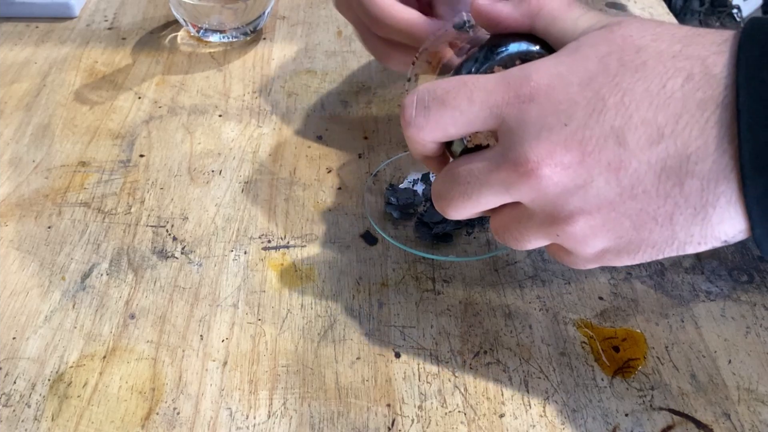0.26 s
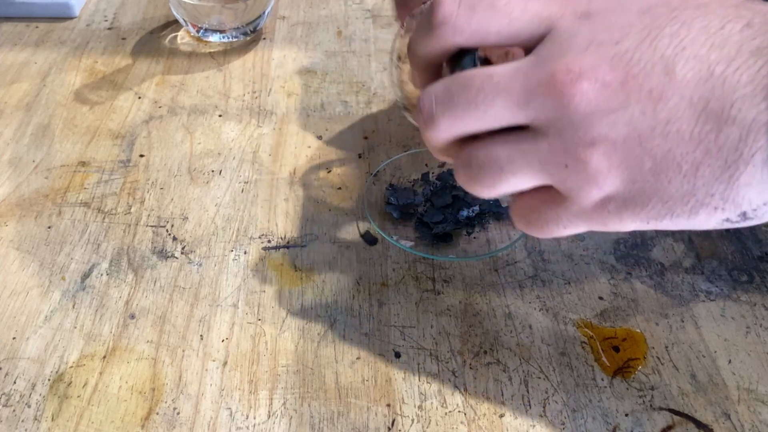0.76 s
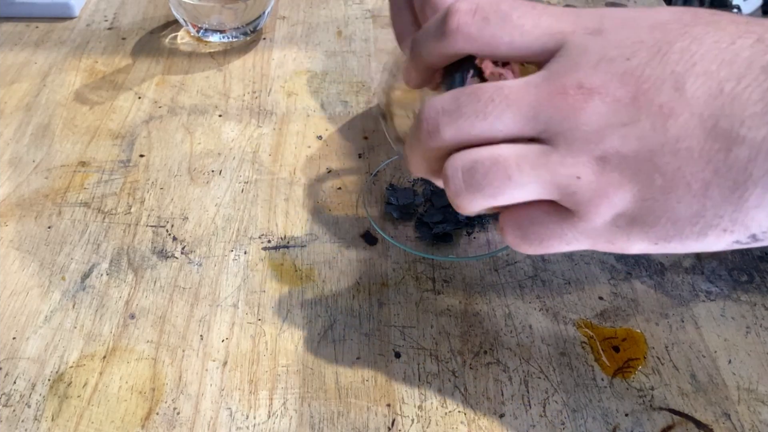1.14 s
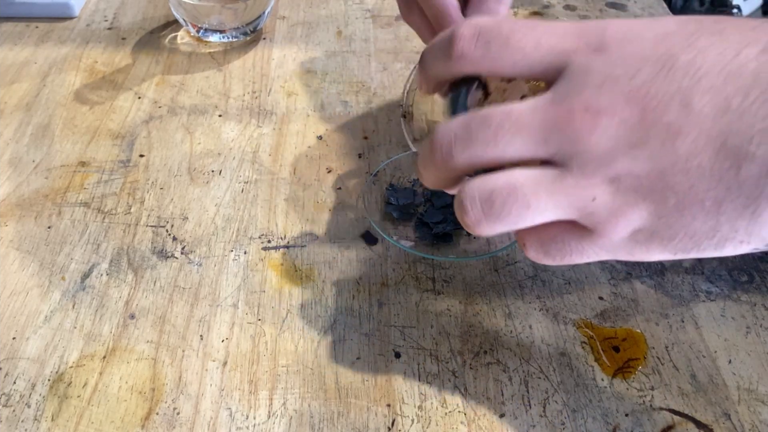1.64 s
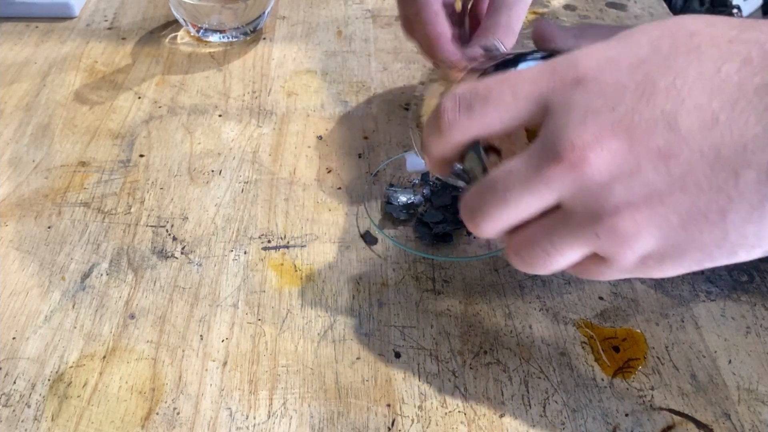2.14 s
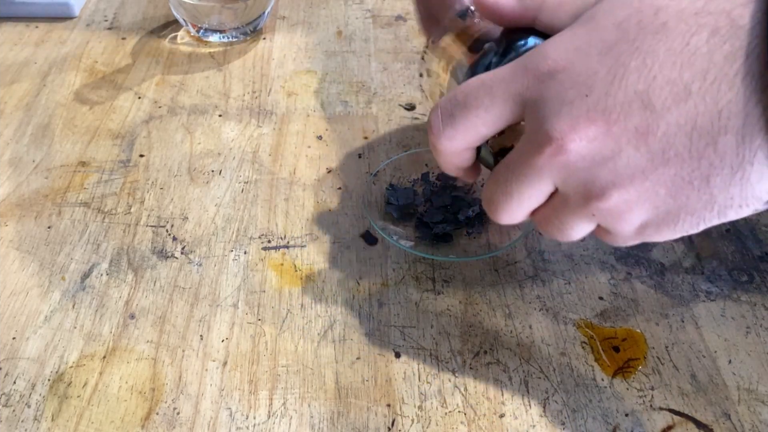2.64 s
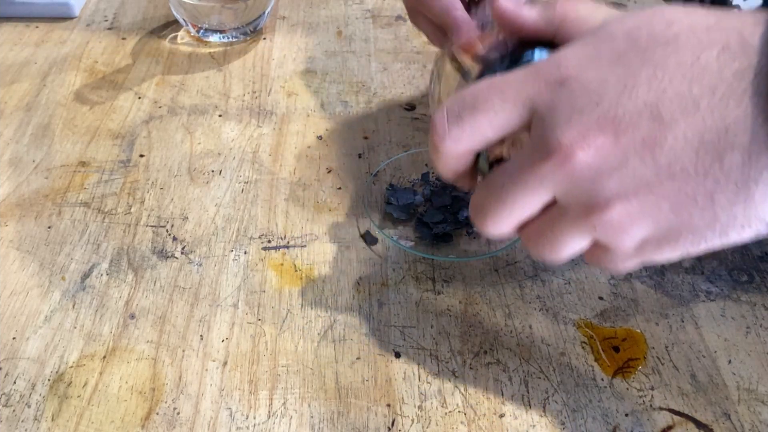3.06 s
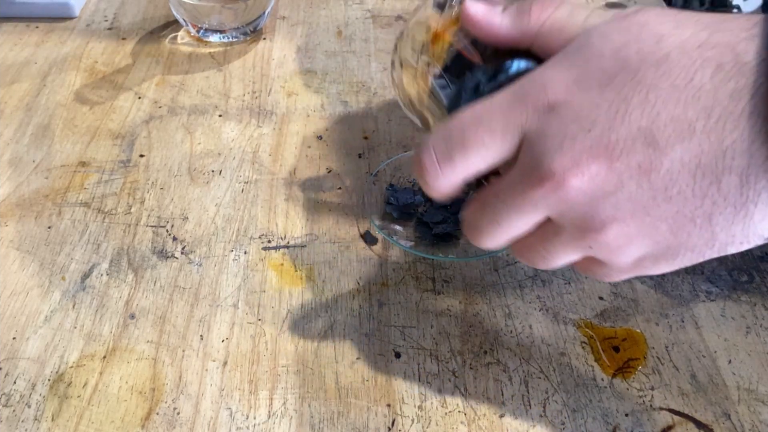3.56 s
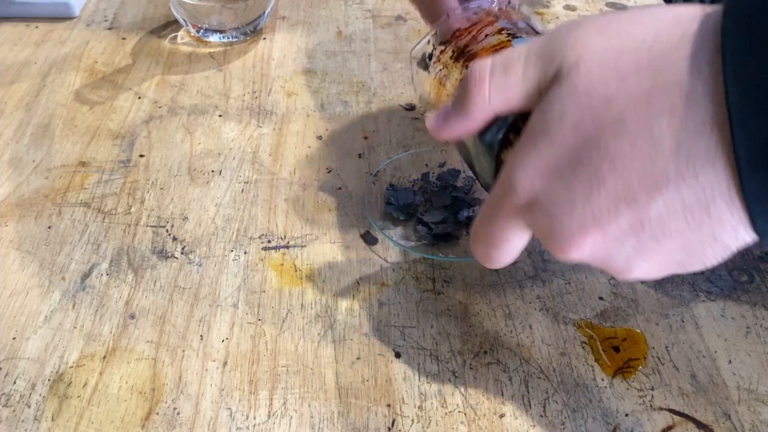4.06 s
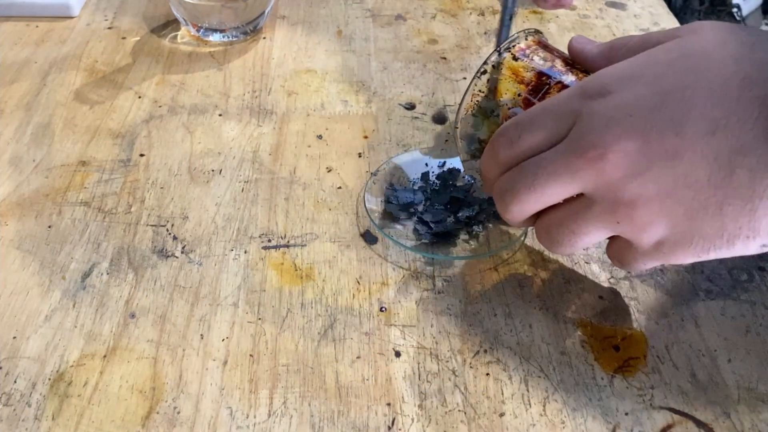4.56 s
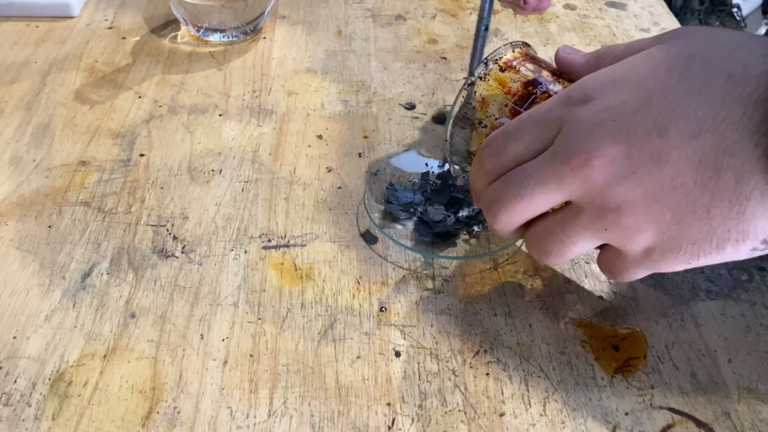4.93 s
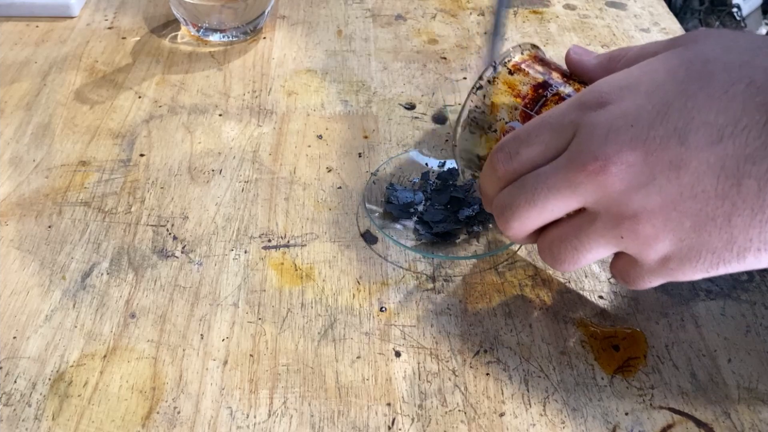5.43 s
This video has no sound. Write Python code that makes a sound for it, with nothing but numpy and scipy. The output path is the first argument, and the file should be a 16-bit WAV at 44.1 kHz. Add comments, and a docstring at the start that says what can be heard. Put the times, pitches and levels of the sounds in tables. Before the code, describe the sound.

A small room with a low ventilation rumble, faint hiss and a distant engine humming deep, its pitch gently hunting, swelling until about 1.7 s and fading after 4.3 s. Close up, a steel spatula works in a hand-held glass beaker over a glass dish. A glassy clink at 0.07 s, with dish and beaker touching; then short dry clinks near 1.1, 1.4, 1.7, 2.0 and 2.3 s. From 2.6 to 3.4 s it gets busier: quiet pokes, gritty rasping strokes, dry lumps landing with dull little knocks, and a brief ragged squeak at 3.2 s. Bright glass clinks at 3.7 and 4.0 s, the first strongest, with crumbs snapping just after. A short scrape and knock at 4.55 s lead to loud, hard steel knocks on the rim at 4.9, 5.13 (loudest), 5.4 and 5.63 s, quickly damped, with short room reverberation.

```python
"""A glassy clink over a low rumble, then more clinks and gritty scrapes, and at last bright steel knocks:
a steel spatula clears dry lumps from a hand-held glass beaker over a glass dish, then is knocked on its rim.
Each contact is a burst of noise (the crack) plus short decaying tones; scrapes are filtered random slips.
Decaying noise makes the small room; shaped noise is the ventilation, wavering harmonics a distant engine."""
import sys
import numpy as np
from scipy import signal
from scipy.fft import rfft, irfft, next_fast_len
from scipy.io import wavfile
from scipy.ndimage import uniform_filter1d

SR = 44100
rng = np.random.default_rng(int(sys.argv[2]) if len(sys.argv) > 2 else 0)


def persist_wave(psi):
    """Save psi, clipped to +-1, as 16-bit WAV."""
    counts = np.round(np.clip(psi, -1, 1) * 32767).astype(np.int16)
    wavfile.write(sys.argv[1], SR, np.atleast_2d(counts).T)


N = 251399
TIME = np.arange(N) / SR  # seconds

# Ring of the beaker wall. Each row: pitch in Hz, level in dB, time to fade by 60 dB in seconds.
BEAKER_MODES = [(1335, -12, .06), (1374, -8, .15), (2320, -17, .05), (2730, -13, .03), (3150, -16, .025),
                (3610, 0, .055), (3700, -8, .05), (6217, -5, .06), (6360, -10, .06), (6470, -5, .07),
                (6750, -6, .055), (7638, -10, .03), (8209, -8, .03), (8560, -12, .03), (8990, -10, .03),
                (9959, -11, .05), (11400, -19, .02), (14184, -17, .02), (15024, -24, .025)]
# Ring of the steel blade. Each row: pitch in Hz, level in dB, time to fade by 60 dB in seconds.
BLADE_MODES = [(1302, -11, .03), (1496, -8, .024), (2024, -10, .023), (2255, -7, .025), (2955, -11, .02),
               (3219, -8, .03), (3596, -4, .036), (4134, -6, .025), (4333, -6, .023), (4812, -10, .045),
               (5282, -11, .03), (5733, -8, .02), (6160, -1, .04), (6320, -6, .035), (6457, -2, .055),
               (6730, -12, .03), (7640, -11, .025), (8080, -12, .02), (8553, -12, .035), (9000, -12, .02),
               (9385, -7, .033), (9600, -11, .028), (11250, -15, .02), (11617, -13, .025),
               (12030, -11, .03), (14647, -17, .025)]
# Ring of the glass dish. Each row: pitch in Hz, level in dB, time to fade by 60 dB in seconds.
DISH_MODES = [(2790, -6, .04), (2870, -5, .04), (3617, -7, .035), (7150, -5, .014), (7530, -2, .016),
              (8037, 1, .025), (8397, -2, .016), (8704, -3, .018), (9550, -8, .015), (11590, -13, .02),
              (13250, -12, .012)]
# Tone colour of a dull thud. Each row: frequency in Hz, relative level in dB.
THUD_SPECTRUM = [(250, -8), (480, -7), (750, 11), (1000, -3), (1800, -7), (6000, -25)]


def undb(db):
    """Turn decibels into a gain."""
    return 10 ** (np.asarray(db) / 20)


def unit(x):
    """Scale to an average strength (rms) of one."""
    return x / np.sqrt(np.mean(x ** 2))


def fade(t, t60):
    """Fade exponentially, as damped vibrations do: 60 dB down after t60 seconds."""
    return np.exp(-np.log(1000) * t / t60)


def colour(x, points):
    """Shape a sound by a spectrum of (Hz, dB) points and scale it to an rms of one."""
    hz, db = np.transpose(points)
    f = np.maximum(np.fft.rfftfreq(len(x), 1 / SR), 1)
    curve_db = np.interp(np.log(f), np.log(hz), db)
    return unit(irfft(rfft(x) * undb(curve_db), len(x)))


def noise(points, size):
    """Make random noise with the given spectrum."""
    return colour(rng.standard_normal(next_fast_len(size)), points)[:size]


def walk(rate):
    """Wander slowly at random, with about `rate` new values a second and an rms near one."""
    k = int(SR / rate)
    steps = np.repeat(rng.standard_normal(N // k + 1), k)
    smooth = uniform_filter1d(uniform_filter1d(steps, k), k)
    return unit(smooth[:N])


def add(out, s, x):
    """Mix x into out from time s in seconds."""
    i = int(s * SR)
    out[i:i + len(x)] += x[:N - i]


def ventilation(sway_db=-0.3):
    """Moving air gives a low rumble and faint hiss: noise whose level sways slightly."""
    # Spectrum of the air noise. Each row: frequency in Hz, relative level in dB per Hz.
    air_spectrum = [(20, -46), (33, -12), (48, -2), (100, -3), (140, -6), (200, -16.5), (310, -18.5),
                    (410, -18.5), (600, -24), (850, -24), (1500, -28.5), (5400, -33), (10000, -44),
                    (16000, -58)]
    level_db = -50 + sway_db * walk(4.68)
    return noise(air_spectrum, N) * undb(level_db)


def engine(waver_db=2.5, boom_db=6, boom_width_hz=28):
    """A distant engine hums: its speed hunts, its harmonics waver, and those in one moving band boom."""
    # Harmonics of the engine. Each row: multiple of the firing rate, level in dB before waver and boom.
    harmonics = [(4, -4), (5, -6), (6, 0), (7, -6), (8, -4), (9, -11), (10, -4), (11, -8), (12, -11),
                 (16, -11), (17, -10)]
    mean_hz, hunt_depth, hunt_period_s, fastest_at_s = 24.39, 0.025, 3.7, 3.4
    hunt = np.cos(2 * np.pi * (TIME - fastest_at_s) / hunt_period_s)
    firing_hz = mean_hz * (1 + hunt_depth * hunt)
    turns = np.cumsum(firing_hz) / SR
    # The level swells by 5.5 dB in the first 1.7 s, holds, then drops by 12.5 dB.
    swell = np.clip(TIME / 1.7, 0, 1)
    drop = np.clip((TIME - 4.31) / 0.62, 0, 1)
    level_db = -53 - 5.5 * (1 - swell) - 12.5 * drop
    # The booming band rises once and sinks again.
    boom_rest_hz, boom_rise_hz, boom_peak_at_s, boom_rise_s = 149.3, 44, 3.87, 0.8
    boom_hz = boom_rest_hz + boom_rise_hz * np.exp(-((TIME - boom_peak_at_s) / boom_rise_s) ** 2)
    out = 0
    for k, db in harmonics:
        boom = boom_db * np.exp(-((k * firing_hz - boom_hz) / boom_width_hz) ** 2)
        gain = undb(db + boom + waver_db * walk(9))
        out = out + gain * np.sin(2 * np.pi * (k * turns + rng.random()))
    return unit(out) * undb(level_db)


def room(x, wet_db=-7, low_t60=0.53, mid_t60=.44, first_s=0.0029, build_s=0.006):
    """Scattered reflections arrive after a short gap and build up; the treble dies first."""
    # Tone colour of the reflections. Each row: frequency in Hz, relative level in dB.
    reflection_spectrum = [(300, 4.5), (1400, 0), (2900, -5), (4000, -2), (6400, 1), (8000, -1.5),
                           (10000, 1), (15000, 4.5)]
    t = TIME[:SR * 3 // 4]
    spectrum = rfft(noise(reflection_spectrum, len(t)))
    f = np.fft.rfftfreq(len(t), 1 / SR)
    tail = np.zeros(len(t))
    width = SR / 18  # nine equally wide bands, in Hz
    for k in range(9):
        t60 = np.interp((k + .5) * width, [1200, 6500, 14000], [low_t60, mid_t60, .78 * mid_t60])
        tail += irfft(spectrum * (f // width == k), len(t)) * fade(t, t60)
    tail *= np.clip((t - first_s) / build_s, 0, 1)
    tail /= np.linalg.norm(tail)
    return x + undb(wet_db) * signal.fftconvolve(x, tail)[:N]


def hardness(hz, treble_db):
    """A harder contact is shorter and brighter: gain of 0 dB at 4 kHz, treble_db at 12 kHz."""
    return treble_db * (hz - 4000) / 8000


def ring(modes, t, treble_db, low_db=0, rise_cycles=1.6):
    """Damped tones build up over a few cycles; place of contact and grip vary their strength and pitch."""
    hz, db, t60 = np.transpose(modes)
    size, pitch, phase = rng.standard_normal((len(hz), 3)).T
    lowest = hz == hz.min()
    gain = undb(db + 2 * size + hardness(hz, treble_db) + low_db * lowest)
    cycles = np.outer(hz * (1 + .003 * pitch), t)
    envelope = (1 - np.exp(-cycles / rise_cycles)) * fade(t, t60[:, None])
    return gain @ (np.sin(2 * np.pi * (cycles + phase[:, None])) * envelope)


def crack(t, treble_db):
    """A contact stirs a crowd of quickly damped tones, made here as a burst of fading noise."""
    # Tone colour of the crack. Each row: frequency in Hz, relative level in dB.
    crack_spectrum = [(150, -48), (500, -19), (750, -11.5), (1000, -19), (2000, -8), (2900, -0.5),
                      (4300, -2), (5300, -16.5), (6400, -2), (8300, -2.5), (9700, -7.5), (10500, -9.5),
                      (12000, -13.5), (15500, -20.5)]
    points = [(hz, db + hardness(hz, treble_db)) for hz, db in crack_spectrum]
    return noise(points, len(t)) * fade(t, 0.043)


def onset(t):
    """The force of a contact builds up in a fraction of a millisecond."""
    return 1 - np.exp(-t / 0.00039)


def lumps(t60=0.045):
    """Dry lumps land on the dish with a dull, short knock of fading noise."""
    # Landing lumps. Each row: start in seconds, level in dB.
    landings = [(2.643, -40.5), (2.674, -47), (2.996, -43), (3.008, -46), (3.052, -46.5), (3.205, -50.5)]
    out, t = np.zeros(N), TIME[:SR // 5]
    for s, db in landings:
        add(out, s, undb(db) * noise(THUD_SPECTRUM, len(t)) * fade(t, t60))
    return out


def snaps():
    """A crumb breaks off the crust with a tick and no ring."""
    # Snapping crumbs. Each row: start in seconds, level in dB, extra treble in dB at 12 kHz.
    crumbs = [(1.835, -52, 3), (4.05, -39, 8), (4.156, -47.5, -23)]
    out, t = np.zeros(N), TIME[:SR // 10]
    for s, db, treble_db in crumbs:
        add(out, s, undb(db) * crack(t, treble_db) * onset(t))
    return out


def squeaks(rough=0.02):
    """The skidding edge of the blade sings for a moment on a ragged, gliding pitch."""
    # Brief squeaks. Each row: middle in seconds, first pitch in Hz, last pitch in Hz.
    skids = [(3.205, 4500, 4760), (3.208, 8300, 8450), (3.22, 6700, 6320), (3.232, 4800, 3850),
             (3.243, 9300, 9560)]
    length_s, level_db, slope_db = 0.016, -44, -8  # the higher a squeak, the fainter
    out, t = np.zeros(N), TIME[:SR // 20]
    along = np.minimum(t / length_s, 1)
    for s, first_hz, last_hz in skids:
        jitter = unit(uniform_filter1d(rng.standard_normal(len(t)), size=40))
        hz = (first_hz + (last_hz - first_hz) * along) * (1 + rough * jitter)
        gain = undb(level_db + hardness(first_hz, slope_db))
        tone = np.sin(2 * np.pi * np.cumsum(hz) / SR)
        add(out, s - length_s / 2, gain * np.sin(np.pi * along) * tone)
    return out


def scrapes(slips_per_s=4000, catch_hz=430, catch_wander=.22, catch_db=4):
    """Fine slips on the crust rasp and make the wall sing; the blade catches and frees at a wandering rate."""
    # Strokes along the wall. Each row: middle in seconds, half length in seconds,
    # level of the grit in dB, level of the singing wall in dB.
    strokes = [(.338, 0.021, -87.5, -71), (1.07, 0.044, -62, -69), (2.668, 0.045, -53, -51.5),
               (3.014, 0.069, -58.5, -57.5), (3.219, 0.054, -48, -54), (3.376, 0.069, -58, -51.5),
               (4.578, 0.03, -41, -54)]
    # Rasp of the blade on the crust. Each row: frequency in Hz, relative level in dB.
    rasp_spectrum = [(300, -24), (900, -23), (2300, 1), (4600, -6), (5600, -11), (6400, -8), (7500, -8.5),
                     (8500, -4), (10000, -18), (16000, -23)]
    # Wall tones drawn out by rubbing. Each row: pitch in Hz, filter width in Hz, level in dB.
    rubbed_modes = [(1377, 69, -6.5), (3622, 103, 2.5), (6420, 250, -13.5), (8310, 200, -16)]
    slips = (rng.random(N) < slips_per_s / SR) * rng.standard_normal(N)
    cycles = np.cumsum(catch_hz * np.exp(catch_wander * walk(70))) / SR
    # One click for each whole cycle, with a random strength.
    catches = np.diff(np.floor(cycles), prepend=0) * undb(4.9 * rng.standard_normal(N))
    blade_ring = ring(BLADE_MODES, TIME[:SR // 10], 0)
    blade = unit(signal.fftconvolve(catches, blade_ring)[:N])
    grit = colour(unit(slips) + undb(catch_db) * (blade + unit(catches)), rasp_spectrum)
    wall = 0
    for hz, width_hz, db in rubbed_modes:
        b, a = signal.iirpeak(hz, hz / width_hz, fs=SR)
        once = signal.lfilter(b, a, slips)
        twice = signal.lfilter(b, a, once)
        wall = wall + undb(db) * unit(twice)
    out = np.zeros(N)
    for s, half, grit_db, wall_db in strokes:
        pressure = np.cos(np.pi / 2 * np.clip((TIME - s) / half, -1, 1))
        out += pressure * (undb(grit_db) * grit + undb(wall_db) * wall)
    return out


def knocks():
    """The blade is knocked on the rim: mostly steel rings, while the hand damps the glass to a thud."""
    # Knocks on the rim. Each row: start in seconds, strength in dB,
    # extra treble in dB at 12 kHz, level of the beaker's ring in dB.
    rim_hits = [(4.5516, -44, -7, -45), (4.5727, -26, -12, -61), (4.9103, -21, 1, -35.5),
                (5.125, -12.5, 1.5, -53), (5.128, -26, -3, -50), (5.3894, -17.5, 4.5, -53.5),
                (5.6295, -19, 3, -29)]
    crack_db, dish_db, thud_db = -4, -12, -28  # relative to the strength
    out, t = np.zeros(N), TIME[:SR // 4]
    for s, db, treble_db, beaker_db in rim_hits:
        blade = ring(BLADE_MODES, t, treble_db) + undb(crack_db) * crack(t, treble_db)
        dish = undb(dish_db) * ring(DISH_MODES, t, treble_db)
        thud = undb(thud_db) * noise(THUD_SPECTRUM, len(t)) * fade(t, 0.048)
        wall = undb(beaker_db) * ring(BEAKER_MODES, t, treble_db)
        add(out, s, (undb(db) * (blade + dish + thud) + wall) * onset(t))
    return out


def pokes():
    """The blade slips off the crust and hits the wall: the beaker rings, and the dish where the two touch."""
    # Pokes inside the beaker. Each row: start in seconds, strength in dB, extra treble in dB at 12 kHz,
    # lift of the lowest wall tone in dB, level of the dish in dB.
    wall_hits = [(0.0714, -34, 4.5, 14, -20), (1.0829, -30, 7.5, 11.5, -36), (1.0854, -34.5, 15, 12, -45),
                 (1.3749, -27, -2.5, 7, -50), (1.3839, -31.5, 8.5, 8, -55), (1.7216, -34, -5, 9.5, -48),
                 (2.0223, -39.5, 2, 13.5, -70), (2.3209, -25, -3, -14, -47), (2.6109, -36, -4.5, 9, -38),
                 (2.9537, -35.5, -1.5, 12, -37.5), (3.100, -37.5, 4.5, 4, -44),
                 (3.7167, -24.5, 7.5, 17, -18.5), (4.0018, -25.5, -4, 6, -29)]
    blade_db, crack_db = -11, -3  # relative to the strength
    dish_crack_db = -1  # glass on glass, relative to the ring of the dish
    out, t = np.zeros(N), TIME[:SR // 4]
    for s, db, treble_db, low_db, dish_db in wall_hits:
        wall = ring(BEAKER_MODES, t, treble_db, low_db, rise_cycles=1.63)
        blade = undb(blade_db) * ring(BLADE_MODES, t, treble_db)
        blade_crack = undb(crack_db) * crack(t, treble_db)
        dish = ring(DISH_MODES, t, treble_db) + undb(dish_crack_db) * crack(t, treble_db)
        contact = undb(db) * (wall + blade + blade_crack) + undb(dish_db) * dish
        add(out, s, contact * onset(t))
    return out


def scene():
    """Glass and steel sound in the room, over the ventilation and the engine."""
    bench = pokes() + knocks() + snaps() + scrapes() + squeaks() + lumps()
    return (room(bench) + ventilation() + engine())[None]


def record(dry):
    """A steep low-pass filter removes the treble above 15.9 kHz."""
    low_pass = signal.ellip(10, .2, 80, 15900, fs=SR, output="sos")
    return signal.sosfilt(low_pass, dry)


dry = scene()
out = record(dry)
persist_wave(out)
```